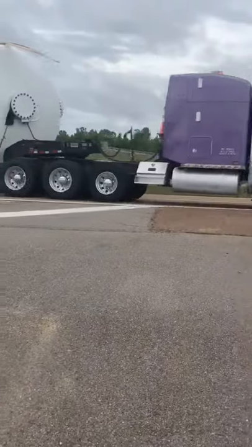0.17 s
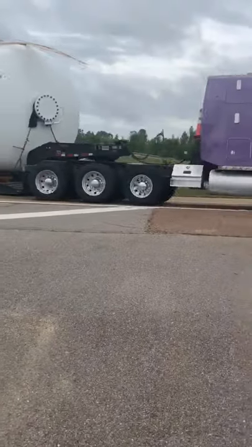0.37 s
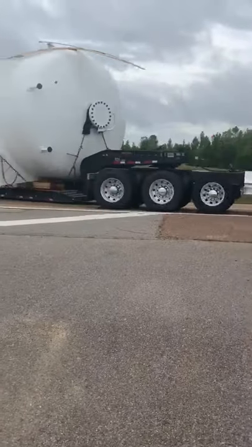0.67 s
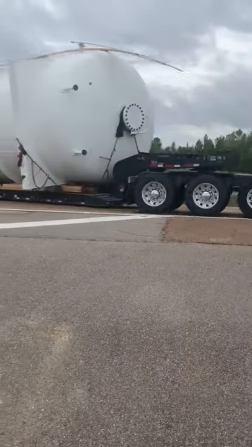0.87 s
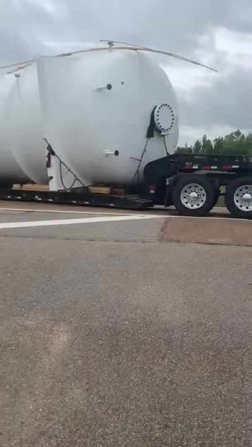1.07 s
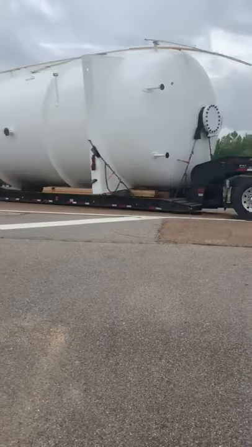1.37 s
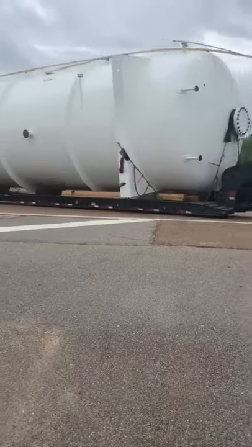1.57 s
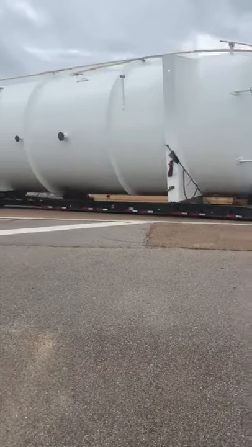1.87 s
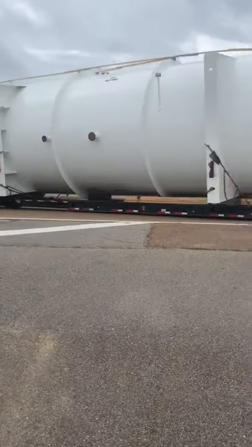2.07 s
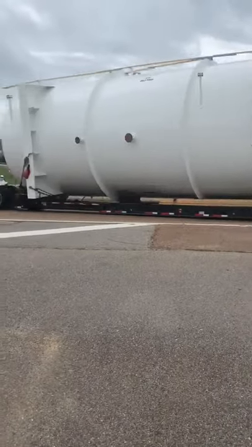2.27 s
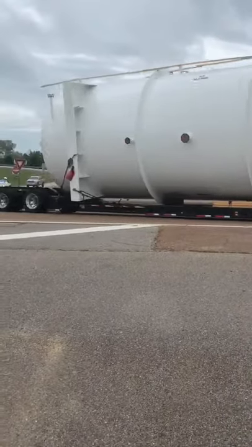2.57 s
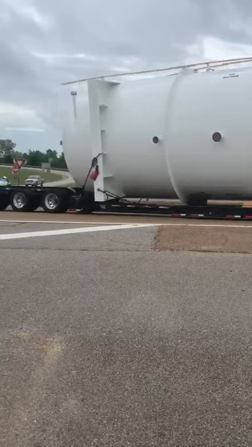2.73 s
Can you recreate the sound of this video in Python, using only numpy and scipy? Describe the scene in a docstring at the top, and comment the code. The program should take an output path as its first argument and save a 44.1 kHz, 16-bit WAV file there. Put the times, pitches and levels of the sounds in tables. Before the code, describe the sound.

Heard from beside an open asphalt road, a big diesel truck rolls by, gently accelerating. Exhaust drone, engine clatter and a rattling cab panel mix with tyre rumble, hiss and a faint high whistle, then one short puff of air.

```python
"""Open asphalt: a heavy six-cylinder diesel truck pulls a long load slowly past, gaining revs.
The firings drive an exhaust drone, a diesel clatter combed by its echo off the road, and a ringing
rattle in a cab panel. Tyres rumble below; intake and tread hiss and a rising turbo whistle sit on top.
The air-brake valve lets out one puff. All is heard by two closely spaced microphone ports."""
import sys
import numpy as np
from scipy import signal
from scipy.fft import rfft, irfft
from scipy.io import wavfile
from scipy.ndimage import uniform_filter1d

SR = 44100
rng = np.random.default_rng(int(sys.argv[2]) if len(sys.argv) > 2 else 0)


def log_audio(samples):
    """Write samples as a 16-bit WAV file to the path given in sys.argv[1]."""
    # one column per channel
    frames = np.atleast_2d(samples).T
    # limit to full scale, then quantise
    limited = np.clip(frames, -1, 1)
    pcm = np.round(limited * 32767).astype(np.int16)
    wavfile.write(sys.argv[1], SR, pcm)


N = 127890
TIME = np.arange(N) / SR
CAB_AWAY_S, CAB_AWAY_SPAN_S = 1.64, 0.12   # the cab moves off
REFLECT_S, SCREEN_S = 1.58, 1.78   # the load's flank reflects some of the engine and screens some


def amp(db):
    """Decibels to gain."""
    return 10 ** (np.asarray(db) / 20)


def rms_one(x):
    """Scale to an rms of 1."""
    return x / np.sqrt(np.mean(x ** 2) + 1e-20)


def automation(rows):
    """One curve over time for each table column after the seconds."""
    seconds, *columns = np.transpose(rows)
    return [np.interp(TIME, seconds, column) for column in columns]


def at_bins(points):
    """A curve over frequency, read at every FFT bin."""
    hz, value = np.transpose(points)
    return np.interp(np.log(np.fft.rfftfreq(N, 1 / SR) + 1), np.log(hz), value)


def colour(x, eq):
    """Apply an EQ that falls to -80 dB an octave past each end, then scale to an rms of 1."""
    curve = [(eq[0][0] / 2, -80)] + list(eq) + [(eq[-1][0] * 2, -80)]
    return rms_one(irfft(rfft(x) * amp(at_bins(curve)), N))


def drift(rate_hz):
    """A smooth random wander with an rms of about 1."""
    hop, settle = 40, 2000
    pole = np.exp(-2 * np.pi * rate_hz * hop / SR)
    noise = rng.standard_normal(N // hop + settle + 2)
    slow = signal.lfilter([1], [1, -2 * pole, pole * pole], noise)[settle:]
    return np.interp(np.arange(N) / hop, np.arange(len(slow)), rms_one(slow))


def fade_in(centre_s, span_s):
    """A smooth step from 0 to 1."""
    return .5 + .5 * np.tanh((TIME - centre_s) / span_s)


def flank(centre_s, span_s=.42):
    """A flat-topped swell to 1 while the load's flank passes."""
    return np.exp(-((TIME - centre_s) / span_s) ** 4)


# The revs. Each row: time in seconds, firing rate in Hz, firing tone level in dB, its octave in dB.
ENGINE_REVS = [(0, 74.3, -32, -31), (.12, 74.7, -32, -32), (.26, 75.3, -31, -43), (.41, 76.0, -30, -30),
               (.68, 76.9, -28, -29), (.9, 78.2, -26, -34), (1.1, 79.0, -23.5, -32), (1.45, 80.2, -23, -22),
               (1.59, 80.6, -26, -32), (1.78, 81.7, -26, -17), (1.92, 82.7, -27, -18),
               (2.15, 84.1, -36, -26), (2.55, 85.3, -27, -21), (2.9, 86.7, -34, -31)]
# The drone's weaker partials. Each entry: a multiple of crank speed.
CRANK_MULTIPLES = [4.5, 9, 12, 13, 14, 15, 16, 17, 18, 19, 21, 22, 24, 25, 28, 31]
# Their mix. Each row: base level in dB, trend from the middle toward the end in dB,
# change in dB while the load's flank reflects (+) or screens (-) that partial.
PARTIAL_MIX = [(-44, -5.5, 6), (-36.5, 0, -4.5), (-34, 1.5, -3.5), (-36.5, 2.5, -8.5), (-42.5, -3.5, 5),
               (-37.5, -3, -3.5), (-39.5, 1, 7.5), (-53, -12, 14), (-44, -3, -1), (-35.5, 2.5, -15),
               (-53, -7, 10), (-48, 6.5, 2.5), (-60, 9, 14), (-51, 3.5, 6), (-45, -2.5, 6), (-45, 0.5, 1.5)]

def exhaust(firings, waver_db=1.6):
    """Firing tone, octave and crank partials; those on firing harmonics nearly align into pulses."""
    _, tone_db, octave_db = automation(ENGINE_REVS)
    drone = amp(tone_db) * np.sin(2 * np.pi * firings)
    drone += amp(octave_db) * np.sin(4 * np.pi * firings + 1)
    for order, (base_db, trend_db, flank_db) in zip(CRANK_MULTIPLES, PARTIAL_MIX):
        level_db = base_db + trend_db * np.tanh(TIME - TIME.mean()) + waver_db * drift(3.0)
        level_db += flank_db * flank(REFLECT_S if flank_db > 0 else SCREEN_S)
        scatter_cycles = 1 if order % 3 else .1   # three firings to a turn of the crank
        cycles = firings * order / 3 + scatter_cycles * rng.standard_normal()
        drone -= amp(level_db) * np.cos(2 * np.pi * cycles)
    return np.sqrt(2) * drone


# The road's comb filter. Each row: time in seconds, spacing of the teeth in Hz.
ROAD_COMB = [(0, 370), (1.2, 388), (1.6, 418), (2.3, 452), (2.6, 484), (2.9, 500)]

def road_echo(direct, echo_db=-4, cutoff_hz=5400):
    """Direct sound plus its duller bounce off the road, whose delay shrinks as the truck moves off."""
    spacing_hz, = automation(ROAD_COMB)
    dull = signal.sosfilt(signal.butter(2, cutoff_hz, fs=SR, output="sos"), direct)
    samples = np.arange(N)
    echo = np.array([np.interp(samples - SR / spacing_hz, samples, channel) for channel in dull])
    return direct + amp(echo_db) * echo


# The clatter's fader. Each row: time in seconds, level in dB.
CLATTER_FADER = [(0, -36.5), (.5, -30), (1.2, -26.5), (1.3, -28.5), (1.5, -26.5), (1.68, -29), (2.0, -27),
                 (2.6, -26.5), (2.82, -26.5), (2.9, -29.5)]
# Its tone early and late in the pass. Each row: frequency in Hz, relative gain in dB.
CLATTER_EARLY_EQ = [(500, 7), (800, -8.5), (1130, -0.5), (1400, 1), (1540, 3.5), (1680, 3), (2000, -2),
                    (2500, -7.5), (3200, -12), (4500, -44)]
CLATTER_LATE_EQ = [(500, -14), (800, -13), (1150, -1), (1350, 2), (1490, 2.5), (1620, -1.5), (1820, 3.5),
                   (2150, -2), (2700, -13), (3400, -13), (4500, -31)]

def diesel_clatter(firings, depth=1.4, decay_per_firing=4.0, spread_db=1.0):
    """Noise knocked louder at every firing; alternate firings are stronger, more so from the rear."""
    strength = amp(spread_db * rng.standard_normal(400))[firings.astype(int)]
    decay = np.exp(-decay_per_firing * (firings % 1))
    envelope = uniform_filter1d(1 + depth * strength * decay, size=60)
    lope_depth = 0.056 + 0.224 * fade_in(CAB_AWAY_S, span_s=0.71)
    lope = 1 + lope_depth * np.sin(np.pi * firings)
    knocks = envelope * lope * rng.standard_normal((2, N))
    late = fade_in(centre_s=1.28, span_s=0.12)
    clatter = (1 - late) * colour(knocks, CLATTER_EARLY_EQ) + late * colour(knocks, CLATTER_LATE_EQ)
    return amp(automation(CLATTER_FADER)[0]) * rms_one(road_echo(clatter))


def panel_ring(taps, pitch_hz=1500, damping_hz=84):
    """One narrow resonance, run twice so that each tap swells and dies."""
    radius, angle = np.exp(-2 * np.pi * damping_hz / SR), 2 * np.pi * pitch_hz / SR
    poles = [1, -2 * radius * np.cos(angle), radius * radius]
    return signal.lfilter([1], poles, signal.lfilter([1], poles, taps + 1e-18))


# The panel's hardest knocks. Each row: start in seconds, peak level in dB.
HARD_KNOCKS = [(1.103, -15), (2.799, -14.5), (2.8426, -12)]

def panel_rattle(firings, spread_db=4.5, under_clatter_db=6.5, duck_db=11):
    """A cab panel rings at each firing, ducked while the load screens it; hard knocks cut through."""
    taps = np.diff(np.floor(firings), prepend=0) * amp(spread_db * rng.standard_normal(N))
    level_db = automation(CLATTER_FADER)[0] - under_clatter_db - duck_db * flank(SCREEN_S)
    knocks = np.zeros(N)
    for start_s, peak_db in HARD_KNOCKS:
        knocks[int(start_s * SR)] = amp(peak_db)
    ring_peak = panel_ring(signal.unit_impulse(N)).max()
    return amp(level_db) * rms_one(panel_ring(taps)) + panel_ring(knocks) / ring_peak


# The rumble's fader. Each row: time in seconds, level in dB before the trim.
RUMBLE_FADER = [(0.0, -29), (1.12, -25.5), (1.44, -22.5), (1.95, -21.5), (2.23, -24), (2.69, -24),
                (2.74, -29), (2.9, -27.5)]
# Its body. Each row: frequency in Hz, relative gain in dB.
RUMBLE_EQ = [(20, -39), (45, -8), (70, -2.5), (120, 2.5), (200, 11), (280, 1), (380, -4), (480, -2.5),
             (600, 2), (800, -7), (1100, -5)]

def tyre_rumble(trim_db=-5.5, waver_db=1.5):
    """The low roar of tyres and chassis, echoed by the road."""
    roar = rms_one(road_echo(colour(rng.standard_normal((2, N)), RUMBLE_EQ)))
    return amp(automation(RUMBLE_FADER)[0] + trim_db + waver_db * drift(8.0)) * roar


# The hiss's fader. Each row: time in seconds, level in dB before the top dulls.
HISS_FADER = [(0.0, -42), (1.06, -37.5), (1.69, -41), (1.87, -41.5), (2.07, -37.5), (2.45, -36), (2.9, -39)]
# Its tone. Each row: frequency in Hz, relative gain in dB.
HISS_EQ = [(2000, -7), (3200, 4), (4500, 4), (6000, 0.5), (7300, 0), (8700, -7), (10200, -11.5),
           (12000, -7), (14000, -9), (15100, -15), (15700, -16)]

def intake_and_tread_hiss(firings, shelf_hz=9000, shelf_db=-7.5, flutter_db=1.0):
    """Hiss faintly pulsed by the firings; its top dulls as the cab moves off."""
    pulse = 1 + 0.13 * np.cos(2 * np.pi * firings)
    hiss = colour(pulse * rng.standard_normal((2, N)), HISS_EQ)
    top = irfft(rfft(hiss) * at_bins([(shelf_hz, 0), (shelf_hz * 1.12, 1)]), N)
    top_gain = amp(shelf_db * fade_in(centre_s=2.13, span_s=0.2))
    hiss += (top_gain - 1) * top
    return amp(automation(HISS_FADER)[0] + flutter_db * drift(22.0)) * hiss


# The turbo spooling up. Each row: time in seconds, pitch in Hz, level in dB.
TURBO_GLIDE = [(0, 6310, -47), (.3, 6570, -47), (.75, 7000, -45), (1.05, 7290, -39), (1.2, 7430, -41),
               (1.35, 7570, -47), (1.8, 7790, -48), (2.3, 8080, -52), (2.9, 8200, -55)]

def turbo_whistle(jitter_hz=35, blur=3.5, flutter_db=4.5):
    """A rising, unsteady whistle whose pitch blurs as the cab moves off."""
    pitch_hz, level_db = automation(TURBO_GLIDE)
    wander_hz = jitter_hz * (1 + blur * fade_in(CAB_AWAY_S, CAB_AWAY_SPAN_S))
    phase = 2 * np.pi * np.cumsum(pitch_hz + wander_hz * drift(90.8)) / SR
    return np.sqrt(2) * amp(level_db + flutter_db * drift(31.0)) * np.sin(phase)


# The air jet's bright tone. Each row: frequency in Hz, relative gain in dB.
PUFF_EQ = [(2500, 0), (4300, 0), (5500, 0), (8000, -0.5), (11000, 2), (15700, -5)]

def brake_puff(start_s=1.8495, attack_s=0.0013, jet_db=-32, jet_t60_s=1, spit_db=-46, spit_t60_s=0.14):
    """The air-brake valve opens with a short spit, and its jet of air dies away."""
    age = np.maximum(TIME - start_s, 0)
    attack = 1 - np.exp(-age / attack_s)
    jet = amp(jet_db - 60 * age / jet_t60_s)
    spit = amp(spit_db - 60 * age / spit_t60_s)
    return attack * (jet + spit) * colour(rng.standard_normal((2, N)), PUFF_EQ)


# Stereo width by frequency: narrow lows, almost all side near 2.8 and 4.9 kHz. Each row: frequency in Hz, side
# over mid in dB with the cab near, the same once it has moved off.
STEREO_WIDTH = [(60, -18, -23), (149, -11.5, -11.5), (430, -22, -19), (950, -13, -13), (1740, -7.5, -7),
                (2270, 3.5, 5), (2454, 0, 3), (2845, 15, 77), (3144, 3.5, 38), (3370, 2.5, -2.5),
                (4195, 5.5, 2.5), (4235, 18, 29), (4940, 79, 18), (5130, 15.5, 3.5), (5450, 3.5, 5),
                (6800, -12, -14), (9300, -11, -6), (10240, 4, 8), (11400, 0, -5), (12200, 9, 17),
                (13500, 2, -9), (14000, -26, -19)]
# How closely the side follows the mid. Each row: frequency in Hz, likeness from 0 to 1.
SIDE_LIKENESS = [(100, 0.8), (1000, 1), (2100, .55), (3500, .4), (5800, 0.32), (10500, .2)]
# The balance. Each row: frequency in Hz, left over right in dB.
BALANCE = [(900, 0), (1300, 0), (1750, -3), (2250, -4), (2550, 0)]

def stereo_image(sound, unrelated):
    """The mid is the sound; the side is its quarter-cycle shift plus unrelated noise."""
    alike = np.clip(at_bins(SIDE_LIKENESS), 0, 1)
    tilt = amp(at_bins(BALANCE) / 2)
    side_spectrum = 1j * alike * rfft(sound) + np.sqrt(1 - alike ** 2) * rfft(unrelated)
    images = []
    for column in (1, 2):
        width_db = at_bins(np.array(STEREO_WIDTH)[:, [0, column]])
        angle = np.arctan(amp(width_db))
        mid, side = np.cos(angle) * rfft(sound), np.sin(angle) * side_spectrum
        images.append(irfft([(mid + side) * tilt, (mid - side) / tilt], N))
    near, far = images
    away = fade_in(CAB_AWAY_S, CAB_AWAY_SPAN_S)
    return (1 - away) * near + away * far


def scene():
    """The whole truck on one engine clock, spread into stereo."""
    firings = np.cumsum(automation(ENGINE_REVS)[0]) / SR   # running count of firings
    # Each noise layer comes as two independent strands; the second feeds only the side.
    noise, unrelated = (diesel_clatter(firings) + tyre_rumble()
                        + intake_and_tread_hiss(firings) + brake_puff())
    truck = noise + exhaust(firings) + panel_rattle(firings) + turbo_whistle()
    return stereo_image(truck, unrelated)


def record(dry, cutoff_hz=15800):
    """A steep low-pass takes off the very top."""
    return signal.sosfilt(signal.ellip(12, .3, 80, cutoff_hz, fs=SR, output="sos"), dry)


dry = scene()
out = record(dry)
log_audio(out)
```